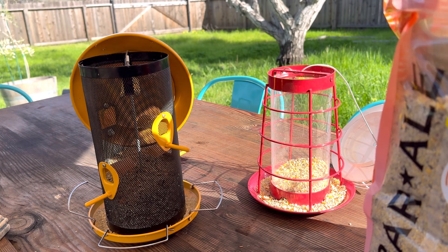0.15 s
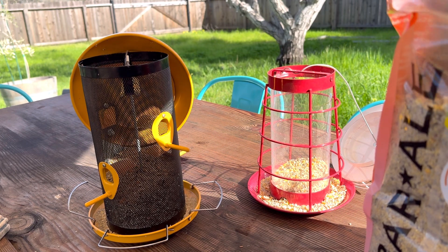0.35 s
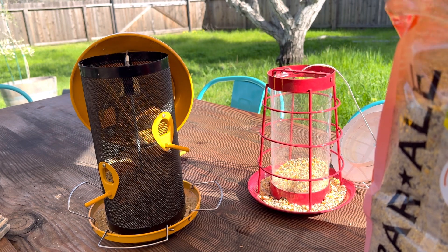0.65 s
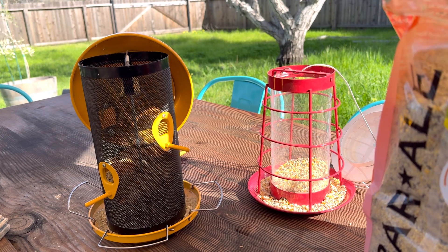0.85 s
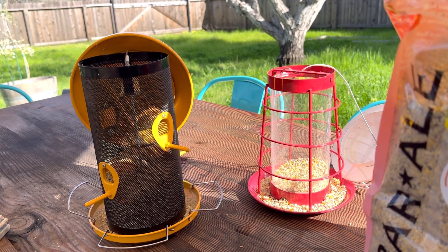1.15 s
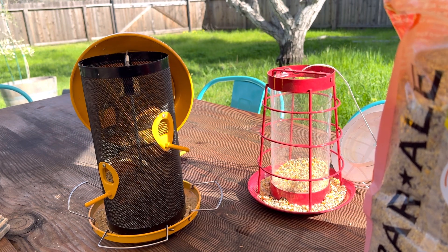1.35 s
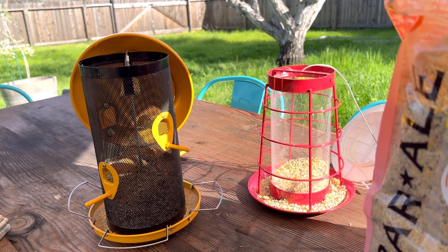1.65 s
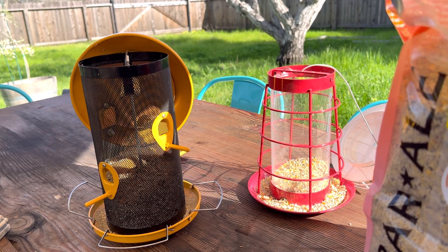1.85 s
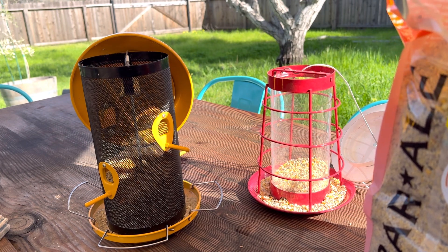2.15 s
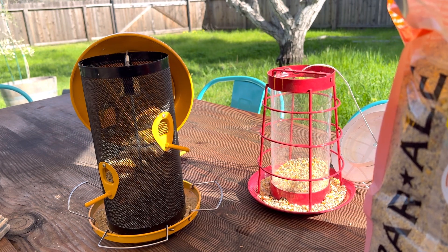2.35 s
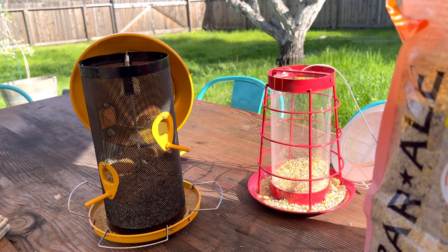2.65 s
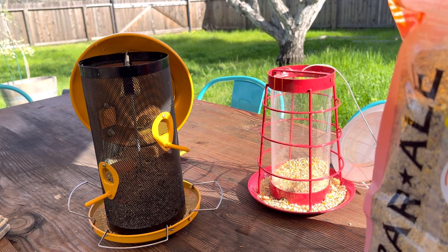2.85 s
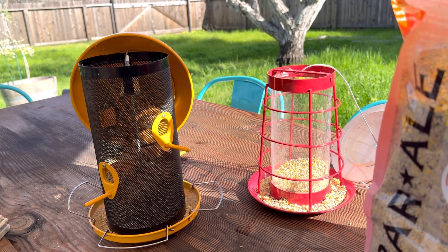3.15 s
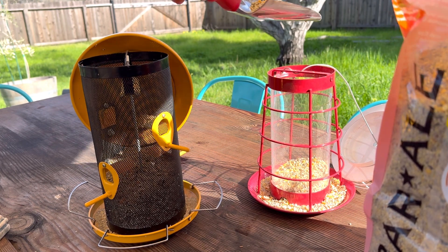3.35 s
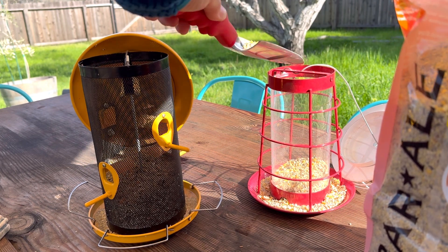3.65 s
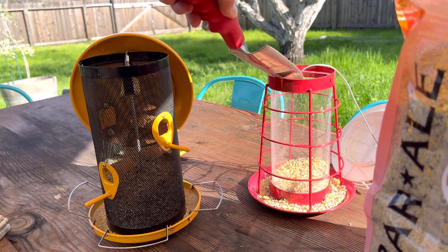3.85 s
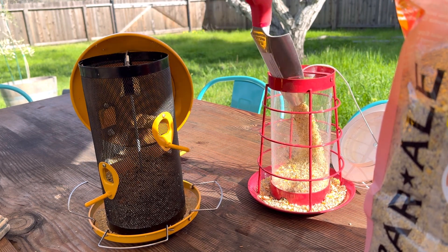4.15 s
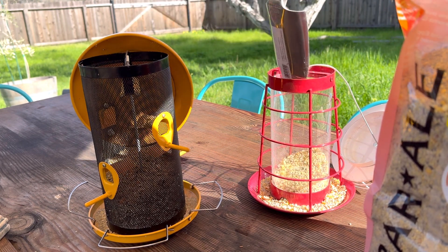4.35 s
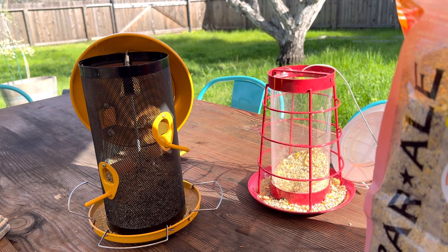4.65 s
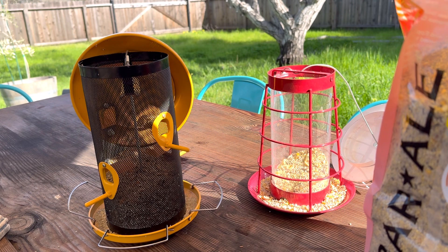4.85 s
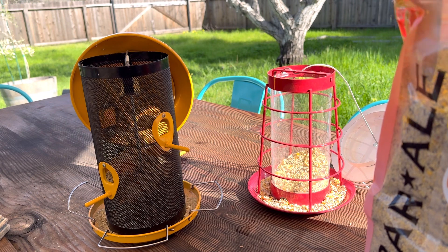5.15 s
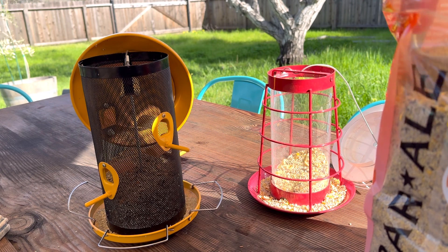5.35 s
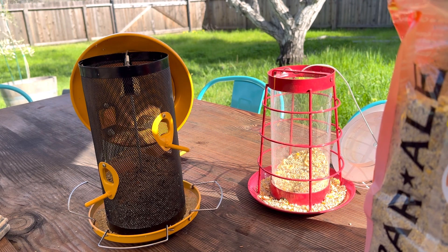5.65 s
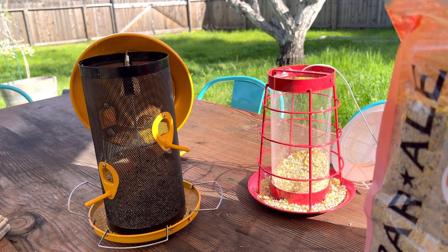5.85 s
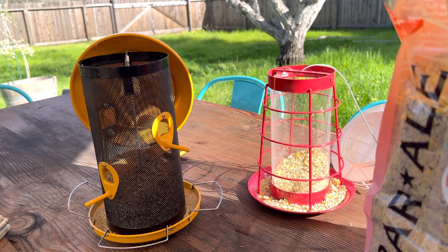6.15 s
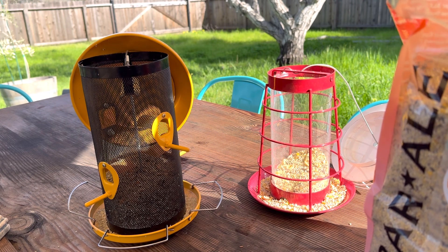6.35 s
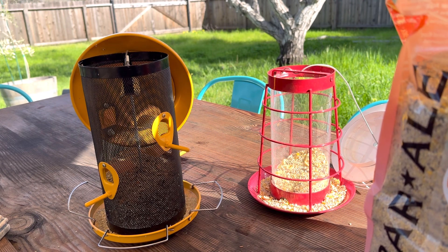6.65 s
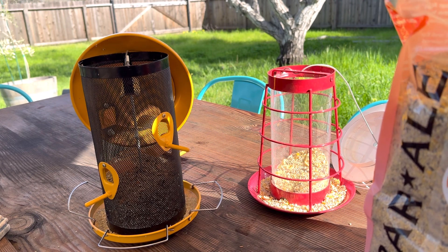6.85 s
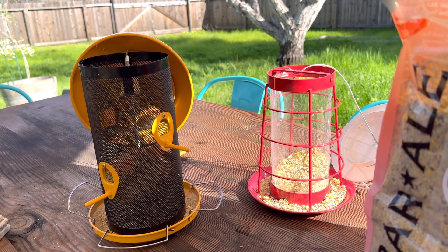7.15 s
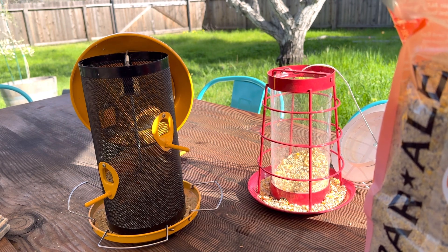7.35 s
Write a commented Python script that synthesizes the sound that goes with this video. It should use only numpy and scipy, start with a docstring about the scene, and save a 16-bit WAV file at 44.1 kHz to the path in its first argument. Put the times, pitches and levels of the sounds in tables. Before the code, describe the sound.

Outdoors in a garden, a close stereo microphone hears busy scooping in a seed sack to the right, with hissing seed, crackling plastic and brief rasps. After a lull of open air and low engine drone, a double knock rocks a hollow feeder ahead, seeds tinkle down in two quick rushes, and a small ringing tap follows. Faint bird chirps pass before the sack rustles again, less steadily.

```python
"""Seeds hiss close on the right as a metal trowel digs in a plastic sack; its film rustles, its creases pop.
The trowel knocks on a plastic tube feeder, seeds slide off its ringing blade, and it digs in the sack again.
Behind lie open air, a droning far engine, buffeting gusts and a few faint bird chirps.
Collisions are swarms of noise grains and tiny tones; creases and thuds are dying bursts of band noise.
Blade and feeder are sums of decaying modes, the engine is steady sines and the birds are gliding tones."""
import sys
import numpy as np
from scipy import signal
from scipy.fft import rfft, irfft, next_fast_len
from scipy.io import wavfile
from scipy.ndimage import uniform_filter1d

SR = 44100
rng = np.random.default_rng(int(sys.argv[2]) if len(sys.argv) > 2 else 0)


def store_pcm(level_fs):
    """Save levels as 16-bit WAV."""
    pcm = np.round(np.clip(level_fs, -1, 1) * 32767).astype(np.int16)
    wavfile.write(sys.argv[1], SR, np.atleast_2d(pcm).T)


N = 330309
TIME = np.arange(N) / SR


def undb(db):
    """Level to amplitude: 20 dB is a factor of ten."""
    return 10 ** (np.asarray(db) / 20)


def unit(x):
    """Normalisation: scale the whole signal to rms 1."""
    return x / np.sqrt(np.mean(x ** 2))


def noise(size, spread):
    """Partial coherence: two channels share one noise and each adds its own, scaled by spread."""
    common = rng.standard_normal(size)
    return unit(common + spread * rng.standard_normal((2, size)))


def colour(x, points):
    """Spectral shaping: filter with a hz, db curve interpolated over log frequency, then scale to rms 1."""
    hz, db = np.transpose(points)
    size = next_fast_len(N + 4096)
    f = np.fft.rfftfreq(size, 1 / SR) + 1
    gain = undb(np.interp(np.log(f), np.log(hz), db))
    return unit(irfft(rfft(x, size) * gain, size)[..., :N])


def band(x, lo_hz, hi_hz, order=2):
    """Band limitation: a causal band-pass."""
    top = min(hi_hz, .47 * SR)
    edges = [min(lo_hz, top - 20), top]
    return signal.sosfilt(signal.butter(order, edges, "band", fs=SR, output="sos"), x)


def walk(rate):
    """Slow random fluctuation: smoothed random steps, rate per second, of rms 1."""
    k = int(SR / rate)
    steps = np.repeat(rng.standard_normal(N // k + 1), k)
    return unit(uniform_filter1d(steps, k)[:N])


def catch_and_slip():
    """Stick-slip friction: the trowel catches and slips, so the level wavers by 1.5 dB rms."""
    return undb(1.5 * walk(27))


def grains(rate, scatter_db, decay_s, spread):
    """Granular collisions: random impacts of very unequal size, each a short swell of noise."""
    chance = rng.random(N)
    size = np.minimum(rng.exponential(size=N), 5)
    energy = (chance < rate / SR) * undb(scatter_db * size) ** 2
    for lag_s in (decay_s, decay_s / 2):
        energy = signal.lfilter([1], [1, -np.exp(-2 / (lag_s * SR))], energy + 1e-18)
    local_mean = np.abs(uniform_filter1d(energy, SR // 10)) + 1e-9  # evens the level over 0.1 s
    return np.sqrt(energy / local_mean) * noise(N, spread)


def pings(count, scatter_db, cycles, range_hz):
    """Impact ringing: each hard seed gives a tiny tone of a few cycles at its own pitch."""
    out, t = np.zeros((2, N)), TIME[:SR // 100]
    low_hz, high_hz = range_hz
    for when, pitch, size, turn in rng.random((count, 4)):
        hz = low_hz * (high_hz / low_hz) ** pitch
        age = t * hz / cycles
        tone = np.sin(2 * np.pi * hz * t + turn * np.array([[1], [-1]]))  # opposite phase shifts
        add(out, when * TIME[-1], undb(scatter_db * size ** 2) * age * np.exp(-age) * tone)
    return unit(out)


def ring(modes, free=1, spread=1.9):
    """Modal superposition: decaying sines, shortened by holding, with scattered phases at the two sides."""
    t = TIME[:SR]
    out = 0
    for hz, db, t60, *_ in modes:
        phase = min(hz / 2000, 1) * spread * rng.uniform(-1, 1, (2, 1))
        decay = undb(-60 * t / (t60 * free))
        out = out + undb(db) * np.sin(2 * np.pi * hz * t + phase) * decay
    return out


def burst(lo_hz, hi_hz, db, rise_s, decay_s, spread, order=2):
    """Transient excitation: a quick rise and exponential decay of band noise; db sets its overall level."""
    t = TIME[:SR // 10]
    tail = undb(-34.0) * np.exp(-t / 0.0084)  # the table top scatters a faint tail
    shape = (1 - np.exp(-t / rise_s)) * (np.exp(-t / decay_s) + tail)
    y = band(noise(len(t), spread) * shape, lo_hz, hi_hz, order=order)
    return unit(y) * undb(db - 11.0)  # rms over the whole 0.1 s


def add(out, s, x):
    """Linear superposition: mix a short sound in at time s."""
    i = max(int(s * SR), 0)
    out[:, i:i + x.shape[1]] += x[:, :N - i]


def swells(table, edge_db, roundness):
    """Energy addition: rows swell and die, edge_db down at rise and fall ends; one gain per level column."""
    power = 0
    for peak_s, rise_s, fall_s, *db in table:
        away = np.maximum((peak_s - TIME) / rise_s, (TIME - peak_s) / fall_s)
        away = np.minimum(away, 3)
        power = power + np.outer(undb(db), undb(edge_db * away ** roundness)) ** 2
    return np.sqrt(power)


# two microphone ports hearing a sound from the right: hz, left_lead_rad, left_minus_right_db
PORT_DIFFERENCES = [(0, 0, 0), (200, -.3, -2), (700, -.7, -7), (1800, -2.6, -5), (2600, -3.9, -4),
                    (3400, -5.8, -3), (4400, -6.7, -3), (6700, -7, -2), (8500, -5.2, 0), (9700, -3.1, 0),
                    (12000, 0, 0), (14700, 3.1, 0), (17000, 5.5, 0)]


def ports(x, side):
    """Interaural-style cues: phase and level differ by frequency; side scales only the level difference."""
    size = next_fast_len(N + 4096)
    hz, lead, pan_db = np.transpose(PORT_DIFFERENCES)
    f = np.fft.rfftfreq(size, 1 / SR)
    pair = undb(np.array([[1], [-1]]) * side * np.interp(f, hz, pan_db) / 2)
    pair = pair / np.sqrt(np.mean(pair ** 2, axis=0))  # keeps the total power at each frequency
    pair = pair * np.exp(1j * np.outer([1, 0], np.interp(f, hz, lead)))
    return irfft(rfft(x, size) * pair, size)[:, :N]


def thud(db):
    """Low-frequency yielding: the heavy wall of the sack gives way once."""
    return burst(128, 285, db, 0.0019, 0.0083, spread=0.73)


# creases of the sack popping; levels before small trims:
# start_s, crunch_length_s, flap_hz, flap_level_db, crack_level_db, tick_level_db
CREASE_POPS = [(0.003, 0.0012, 690, -25, -31.5, -37), (0.018, 0.0014, 810, -23.5, -29.5, -32),
               (0.0334, 0.00045, 950, -24.5, -29, -23), (0.036, 0.0028, 900, -43, -23, -25),
               (0.071, 0.0016, 720, -32, -35.5, -39), (0.161, 0.0041, 1160, -33.5, -34.5, -52),
               (0.1686, 0.0025, 1040, -25, -33.5, -43), (0.19, 0.0012, 870, -25.5, -23, -30),
               (0.22, 0.001, 766, -30, -41, -56), (0.248, 0.00086, 780, -29.5, -29.5, -37),
               (0.289, 0.0025, 910, -37.5, -38, -40), (0.383, 0.0053, 880, -30.5, -36, -33.5),
               (0.4688, 0.0016, 844, -30, -30.5, -41.5), (0.903, 0.0039, 900, -28.5, -31, -35),
               (1.197, 0.0019, 820, -28, -33, -48), (1.404, 0.0026, 760, -37.5, -38, -61),
               (1.42, 0.0019, 813, -39, -40.5, -48), (1.545, 0.002, 860, -41, -53, -55),
               (1.699, 0.0013, 1340, -32.5, -40.5, -48), (1.731, 0.0013, 660, -25.5, -34, -47),
               (1.765, 0.00039, 880, -37.5, -34.5, -46), (1.783, 0.0021, 710, -35.5, -43, -58),
               (1.856, 0.0017, 700, -31, -43, -56), (1.941, 0.00088, 990, -33, -25.5, -39),
               (2.12, 0.00097, 880, -44, -34, -36), (2.127, 0.0026, 1280, -46, -33, -34),
               (2.145, 0.001, 760, -33.5, -39.5, -57), (2.1891, 0.0019, 940, -29.5, -24.5, -32),
               (2.2785, 0.0016, 760, -26, -27, -33), (2.283, 0.00097, 640, -35.5, -40, -58),
               (2.416, 0.002, 1090, -42.5, -59, -66), (2.512, 0.0021, 620, -39, -60, -72),
               (2.566, 0.0038, 900, -58, -46, -42), (2.612, 0.0024, 845, -38.5, -43, -57),
               (2.878, 0.003, 720, -47, -63, -78), (3.365, 0.0007, 1280, -36, -47, -78),
               (3.367, 0.00099, 615, -33, -61, -86), (4.815, 0.0019, 1210, -47.5, -51, -75),
               (4.9114, 0.00073, 1110, -28, -31, -33.5), (4.936, 0.0021, 990, -35.5, -37, -43),
               (4.993, 0.0034, 980, -43, -41, -44.5), (5.221, 0.00098, 970, -29, -33, -39),
               (5.257, 0.0022, 900, -34, -37, -34), (5.282, 0.0012, 980, -34.5, -28.5, -36),
               (5.339, 0.00048, 920, -44, -27.5, -36.5), (5.342, 0.0017, 920, -21, -26, -26),
               (5.446, 0.0016, 880, -27.5, -25.5, -25.5), (5.469, 0.0052, 910, -34, -40, -34.5),
               (5.498, 0.00093, 754, -28, -32.5, -43), (5.546, 0.0023, 880, -30.5, -35.5, -50),
               (5.634, 0.0013, 744, -26, -32, -37), (5.641, 0.0022, 726, -29, -31.5, -39),
               (5.676, 0.0083, 690, -34.5, -39.5, -30.5), (5.937, 0.0019, 800, -34, -44, -69),
               (6.169, 0.0016, 890, -36.5, -44, -65), (6.474, 0.0016, 770, -32, -43.5, -49.5),
               (6.5117, 0.0016, 720, -28.5, -52, -67), (6.675, 0.0024, 720, -37.5, -61, -66),
               (6.6968, 0.0013, 825, -29, -42.5, -78), (6.791, 0.0012, 1060, -33, -23.5, -30),
               (6.84, 0.0018, 796, -39, -46.5, -66), (6.868, 0.0026, 950, -26, -29.5, -36.5),
               (6.9542, 0.0013, 1330, -31.5, -23.5, -36.5), (6.982, 0.0012, 710, -34, -57, -62),
               (7, 0.0062, 750, -36.5, -47, -43), (7.26, 0.0037, 595, -46, -57, -68)]
# the load slumping against the wall of the sack: start_s, level_db
LOAD_SLUMPS = [(0.039, -27), (0.07, -27), (0.249, -25), (1.408, -38.5), (1.601, -26.5), (1.859, -28),
               (2.146, -33), (2.192, -26), (3.367, -31.5), (5.234, -24), (5.447, -29), (5.501, -27),
               (5.64, -27.5), (5.898, -34.5)]


def creases():
    """Buckling: a crease ticks, cracks and flaps, the wall thuds just later; at times the load slumps."""
    out = np.zeros((2, N))
    for s, length, flap_hz, flap_db, crack_db, tick_db in CREASE_POPS:
        # a tighter crease cracks louder than it flaps, and sounds higher
        crack_hz = 2550 * 2 ** (.018 * (crack_db - flap_db))
        tick = burst(5800, 11460, tick_db - 0.4, length * 1.4, length * 0.77, spread=0.047)
        crack = burst(crack_hz / 2.14, crack_hz * 1.67, crack_db + 0.2,
                      length * 3.3, length * 0.92, spread=1.0, order=3)
        flap = burst(flap_hz / 1.69, flap_hz * 1.162, flap_db + 0.51, 0.00026, 0.0041, spread=0.36)
        for part in (tick, crack, flap):
            add(out, s, part)
        add(out, s + 0.00087, thud(flap_db - 7))  # bending waves are slower
    for s, db in LOAD_SLUMPS:
        add(out, s, thud(db))
    return out


# pushes of the trowel through the sack, and near 3.17 s seeds settling faintly in the lifted trowel;
# levels before trims and wavering: peak_s, rise_s, fall_s, seed_hiss_db, film_rustle_db, sack_wall_db
DIGGING_SWELLS = [(0.035, 0.24, 0.054, -40, -34, -31), (0.27, 0.29, 0.56, -44, -50.5, -54),
                  (0.395, 0.066, 0.074, -55, -38.5, -40.5), (0.56, 0.11, 0.16, -41.5, -40, -39),
                  (0.71, 0.12, 0.14, -38.5, -50, -47), (0.91, 0.097, 0.17, -46, -50, -44.5),
                  (1.23, 0.15, 0.14, -52.5, -51.5, -54.5), (1.44, 0.19, 0.053, -51, -55, -42),
                  (1.63, 0.21, 0.066, -49, -53.5, -45.5), (1.89, 0.35, 0.48, -45, -55, -59.5),
                  (2.135, 0.064, 0.019, -38, -44.5, -41), (2.43, 0.16, 0.1, -51, -56.5, -51.5),
                  (2.595, 0.081, 0.039, -48.5, -52, -45), (2.78, 0.28, 0.26, -68.5, -66, -59.5),
                  (3.17, 0.41, 0.22, -75.5, -75.5, -65), (4.88, 0.15, 0.51, -63.5, -59, -57.5),
                  (5.14, 0.16, 0.16, -47.5, -63, -51), (5.245, 0.16, 0.21, -40, -41, -38),
                  (5.49, 0.069, 0.091, -41, -41, -36), (5.76, 0.25, 0.3, -46, -43, -39.5),
                  (5.91, 0.035, 0.026, -69, -56, -46), (6.13, 0.33, 0.086, -55, -55, -49.5),
                  (6.33, 0.1, 0.38, -59, -61.5, -56.5), (6.49, 0.084, 0.077, -63, -54.5, -40),
                  (6.68, 0.097, 0.028, -55.5, -59.5, -53), (6.81, 0.042, 0.22, -57.5, -53, -50),
                  (7.0, 0.029, 0.062, -48, -49.5, -42.5), (7.12, 0.071, 0.049, -48.5, -54.5, -47.5),
                  (7.36, 0.97, 0.88, -57, -64.5, -66.5)]
# spectra of seeds, film and sack wall: hz, relative_level_db
SEED_SPECTRUM = [(500, -21), (1300, 1.5), (2000, 10), (3000, 0), (4500, 1.9), (6500, -4.5), (8300, 3),
                 (9700, -3), (11000, -2), (13500, 0), (15500, -12.5)]
FILM_SPECTRUM = [(200, -13), (400, -4), (600, 4), (850, 4), (1150, -9.5), (1450, -3), (2000, -6),
                 (3000, -15.5), (6000, -30.5)]
WALL_SPECTRUM = [(40, -24), (100, -4.5), (170, -1.5), (280, 1), (400, -14), (800, -29.5), (2000, -53)]
# pitch range of seeds striking each other: lowest_hz, highest_hz
SEED_PITCH_RANGE = (2537, 8470)


def digging():
    """Granular friction: seeds grind past the blade or settle on it, the film crackles, the wall shudders."""
    hiss, film, wall = swells(DIGGING_SWELLS, edge_db=-15.5, roundness=1.96) * catch_and_slip()
    seeds = colour(grains(rate=6000, scatter_db=1.5, decay_s=0.0003, spread=0.35), SEED_SPECTRUM)
    clicks = pings(count=6000, scatter_db=11, cycles=4, range_hz=SEED_PITCH_RANGE)
    rustle = colour(grains(rate=800, scatter_db=3.4, decay_s=0.003, spread=0.81), FILM_SPECTRUM)
    shudder = colour(grains(rate=130, scatter_db=3.5, decay_s=0.0079, spread=0.24), WALL_SPECTRUM)
    grinding = undb(-1.24) * seeds + undb(-6) * clicks
    return hiss * grinding + film * undb(6) * rustle + wall * undb(1.5) * shudder


# spectrum of the open air: hz, relative_level_db
AIR_SPECTRUM = [(25, -1.5), (55, 6), (120, 2), (220, -1), (400, -12), (700, -13), (1200, -16.5),
                (2000, -23.5), (4200, -32.5), (6500, -37.5), (12000, -53.5), (15500, -47)]
# slow course of the open air, before a fixed lift and wavering: time_s, relative_level_db
AIR_COURSE = [(3.2, -56), (3.6, -58), (4.4, -55.5)]
# course of the far engine: time_s, level_db
ENGINE_COURSE = [(0, -47.5), (3.3, -46.5), (3.9, -51.5), (4.7, -56.5), (7.49, -57)]
# steady lines of the engine, before wavering: pitch_hz, relative_level_db
ENGINE_LINES = [(77.3, 3.5), (96.8, 1.5), (54, -11), (137, -8.5), (221, -14), (314, -20.5), (367, -13),
                (409.5, -20)]
# gusts buffeting the microphone: peak_s, relative_level_db
WIND_GUSTS = [(0.87, -38), (0.97, -36.5), (1.165, -32.5), (1.72, -33), (1.99, -29), (2.07, -29),
              (2.29, -39.5), (4.939, -39), (5.26, -30), (5.51, -35)]


def garden():
    """Incoherent addition: open air, a far engine whose low lines beat, and buffeting on the ports."""
    low = colour(noise(N, 0.23), AIR_SPECTRUM)
    wide = colour(noise(N, 6.7), AIR_SPECTRUM)
    air = band(low, 27, 210, order=1) + band(wide, 260, 11000, order=1)
    air_db = np.interp(TIME, *np.transpose(AIR_COURSE)) + 4.5
    out = air * undb(air_db + .5 * walk(1.5) + walk(30))

    drift = np.cumsum(1 + 0.0015 * walk(2)) / SR  # all lines drift in pitch together
    engine = 0
    for hz, db in ENGINE_LINES:
        engine = engine + undb(db + walk(4.4)) * np.sin(2 * np.pi * (hz * drift + rng.random()))
    out += unit(engine) * undb(np.interp(TIME, *np.transpose(ENGINE_COURSE)))

    gusts = [(s, 0.043, 0.043, db) for s, db in WIND_GUSTS]  # equal rise and fall in s
    wind = swells(gusts, edge_db=-11.0, roundness=1.1)
    out += wind * unit(band(noise(N, 0.4), 46, 87))
    return out


# single seeds snapping free in the sack or dropping back: start_s, relative_level_db
LONE_SEEDS = [(0.2957, -25.5), (0.6035, -27.5), (0.845, -30), (0.9768, -31.5), (1.1388, -34), (1.161, -36),
              (1.3227, -36), (1.9583, -27), (1.976, -28), (2.0128, -29.5), (2.066, -25), (2.5357, -40),
              (2.597, -33), (2.8534, -42.5), (2.95, -55.5), (4.652, -53), (4.8229, -50), (5.0956, -23.5),
              (5.1878, -24.5), (5.5864, -32), (5.7094, -31), (5.77, -30.5), (5.967, -36), (6.009, -34),
              (6.0353, -30.5), (6.0693, -35), (6.1182, -37), (6.335, -37), (6.5041, -34.5), (6.6177, -43),
              (6.656, -35.5), (7.376, -35)]


def settling():
    """Isolated impacts: seeds snap free with dry ticks of varied pitch; stray ones keep slipping faintly."""
    slipping = grains(rate=30, scatter_db=2.8, decay_s=0.0013, spread=0.36)
    out = undb(-82.5) * colour(slipping, SEED_SPECTRUM)
    for (s, db), octaves in zip(LONE_SEEDS, rng.uniform(-0.4, 0.2, len(LONE_SEEDS))):
        hz = 6160 * 2 ** octaves
        add(out, s, burst(hz / 2, hz * 2, db - 14, 0.00023, 0.0019, spread=.25))
    return out


# the loaded blade rasping over the film, before wavering: peak_s, rise_s, fall_s, level_db
BLADE_SCRAPES = [(.39, 0.035, 0.071, -37.5), (.56, 0.053, 0.04, -33), (.88, 0.033, 0.028, -45),
                 (5.26, 0.036, 0.053, -39), (5.82, 0.032, 0.025, -35)]
# spectrum of the rasp: hz, relative_level_db
RASP_SPECTRUM = [(400, -24), (700, 5), (1000, -2), (1300, 9), (1600, -14), (2000, 10), (2700, -21),
                 (5000, -10), (9000, -41)]


def scraping():
    """Sliding friction: the loaded blade drags over the film in short, dense rasps."""
    push = swells(BLADE_SCRAPES, edge_db=-17.5, roundness=1.7) * catch_and_slip()
    return push * colour(grains(rate=700, scatter_db=2.6, decay_s=.0012, spread=.9), RASP_SPECTRUM)


# seeds sliding along the trowel, in the sack or off its tip; levels before trims:
# peak_s, rise_s, fall_s, stream_db, blade_rattle_db
SEED_SLIDES = [(1.62, 0.09, 0.14, -52.5, -73), (4.07, 0.15, .1, -61.5, -65),
               (4.15, 0.03, 0.071, -43.5, -61.5), (4.282, 0.017, 0.053, -55, -65),
               (4.352, 0.037, 0.031, -44.5, -48.5), (5.165, .03, .11, -42, -62)]
# spectrum of the falling stream: hz, relative_level_db
STREAM_SPECTRUM = [(2000, -27.5), (3600, -19.5), (4500, -6.5), (6500, -12), (7700, 9.5), (9700, -0.5),
                   (11000, 4.5), (12200, 9), (13500, 2.5), (15500, 4)]
# pitch range of seeds tinkling on blade and tube: lowest_hz, highest_hz
TINKLE_PITCH_RANGE = (4225, 15170)
# modes of the trowel blade ringing freely: pitch_hz, relative_level_db, t60_s, gain_when_seeds_stir_it_db
BLADE_MODES = [(1723, -13, 1, 4.5), (2730, 5.5, 0.66, -26), (4060, -12.5, .1, -2.5), (4760, -6.5, .1, 0.5),
               (5200, -10, 0.12, 7), (6030, -1, 0.081, 1), (6880, -8, 0.11, 2.5), (7550, -9.5, 0.076, -1.5),
               (8300, -6, 0.11, -1), (8730, -10, .08, 1.5), (10930, -14, .08, 2), (11850, -9, .06, 5.5),
               (12300, -8, 0.06, 4.5), (13700, -6, .07, 4)]
# single seeds hitting the blade or the tube hard: start_s, relative_level_db, pitch_hz
HARD_HITS = [(2.122, -31.5, 12540), (2.130, -29, 12700), (4.144, -38.5, 10600), (4.2412, -49, 12400),
             (4.2770, -42, 12200), (4.347, -36, 13700), (4.3668, -46, 8000), (5.002, -38, 2040)]


def pouring():
    """Forced resonance: sliding seeds make the blade sing, then tinkle down the tube onto the heap."""
    stream, rattle = swells(SEED_SLIDES, edge_db=-10.0, roundness=1.44)
    shower = grains(rate=5000, scatter_db=1.5, decay_s=.0003, spread=.3)
    shower = shower + pings(count=6000, scatter_db=12, cycles=9, range_hz=TINKLE_PITCH_RANGE)
    patter = stream * colour(shower, STREAM_SPECTRUM)
    taps = rattle * grains(rate=1500, scatter_db=1, decay_s=0.0014, spread=1.0)

    stirred = [(hz, db + stirred_db, t60) for hz, db, t60, stirred_db in BLADE_MODES]
    blade = ring(stirred, free=.42)
    blade = blade / np.sqrt(np.sum(blade ** 2) / 2)
    blows = band(taps, 1600, 12000, order=1) + patter  # every seed that strikes the blade stirs its modes
    sung = signal.fftconvolve(blows, blade, axes=1)[:, :N]

    out = undb(0.5) * patter + undb(1) * sung + undb(7) * band(taps, 1150, 4600)
    for s, db, hz in HARD_HITS:
        add(out, s, burst(hz / 1.02, hz * 1.08, db, .0003, 0.0021, spread=0.25, order=1))
    return out


# faint bird chirps, pitches before the arch: start_s, length_s, start_pitch_hz, end_pitch_hz, level_db
BIRD_CHIRPS = [(3.74, 0.086, 4350, 3860, -83), (4.47, .07, 3960, 4600, -80.5),
               (4.656, 0.12, 4600, 3900, -78.5)]


def bird():
    """Frequency modulation and reverberation: arched pitch glides, smeared by the fence and trees."""
    out, t = np.zeros((2, N)), TIME[:SR // 3]
    for s, length, start_hz, end_hz, db in BIRD_CHIRPS:
        hz = np.linspace(start_hz, end_hz, int(length * SR))
        hz = hz + 119.3 * np.hanning(len(hz))  # bows upwards in the middle
        chirp = np.hanning(len(hz)) * np.sin(2 * np.pi * np.cumsum(hz) / SR)
        echoes = rng.standard_normal((2, len(t))) * undb(-60 * t / 0.26)  # t60 of 0.26 s
        add(out, s, undb(db) * unit(signal.fftconvolve(echoes, chirp[None], axes=1)))
    return out


# blows of the trowel on the feeder; levels scale the modes:
# start_s, blade_ring_db, feeder_db, share_of_free_ringing_time
FEEDER_KNOCKS = [(3.823, -51.5, -33.5, 0.22), (3.830, -58, -30.5, .15), (4.379, -56.5, -54.5, 0.86)]
# modes of the feeder, plastic body low and wire cage high: pitch_hz, relative_level_db, t60_s
FEEDER_MODES = [(102.3, 2.5, 0.27), (225, 6.5, 0.098), (356, 3.5, 0.19), (733, -18, 0.18),
                (1220, -17, 0.14), (1346, -7, 0.22), (1700, -6.5, 0.044), (2820, -11, 0.064),
                (2970, -8, 0.076), (3400, -19, 0.098), (5006, -19, .09)]


def knocks():
    """Impact and damping: the blade clanks, bounces once and rocks the feeder; the last blow rings longer."""
    blade, feeder = np.zeros((2, 2, N))
    for s, ring_db, feeder_db, free in FEEDER_KNOCKS:
        add(blade, s, undb(ring_db) * ring(BLADE_MODES, free, spread=0.33))
        add(feeder, s, burst(360, 2900, feeder_db - 15.0, 0.00037, 0.029, spread=1.0))
        add(feeder, s + 0.00075, undb(feeder_db - 6) * ring(FEEDER_MODES))
    return ports(blade, side=.5) + feeder


def scene():
    """Spatial superposition: the sack close on the right, the feeder ahead, the garden all round."""
    sack = creases() + digging() + settling() + scraping()
    return ports(sack, side=1) + garden() + ports(pouring(), side=0.61) + bird() + knocks()


def record(dry):
    """Band limitation: the recorder cuts the deepest rumble and everything above 16 kHz."""
    dry = signal.sosfilt(signal.butter(2, 28, "high", fs=SR, output="sos"), dry)
    return signal.sosfilt(signal.ellip(8, .2, 70, 16000, fs=SR, output="sos"), dry)


dry = scene()
out = record(dry)
store_pcm(out)
```